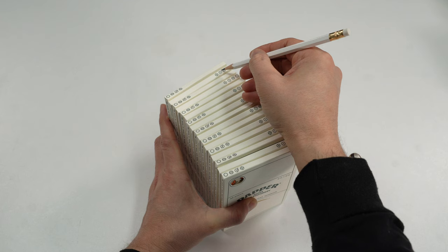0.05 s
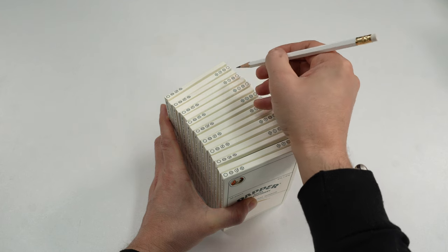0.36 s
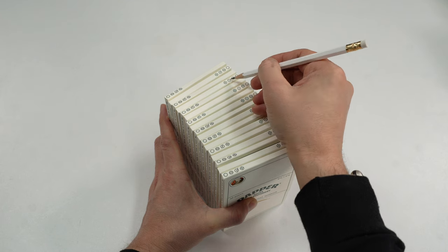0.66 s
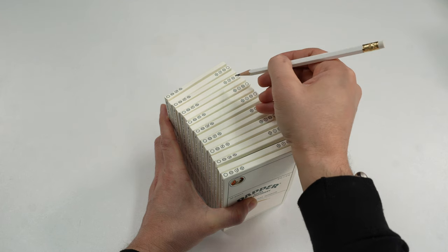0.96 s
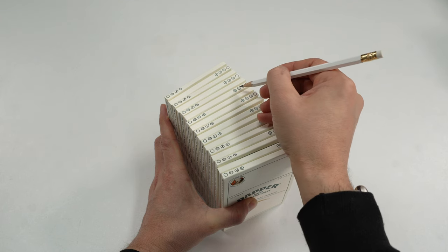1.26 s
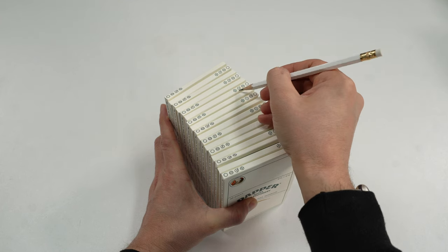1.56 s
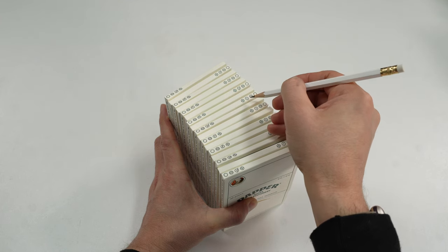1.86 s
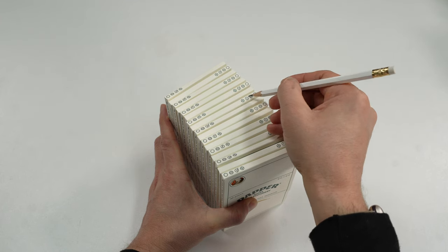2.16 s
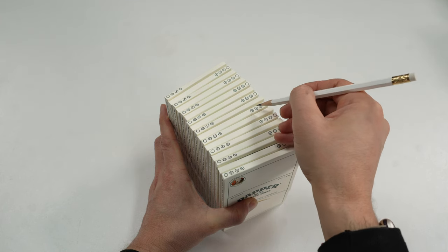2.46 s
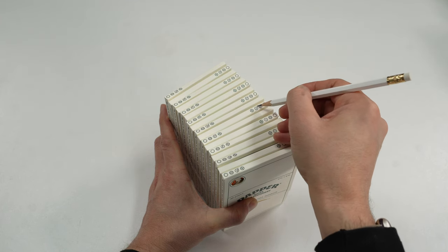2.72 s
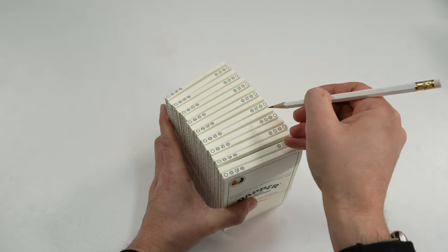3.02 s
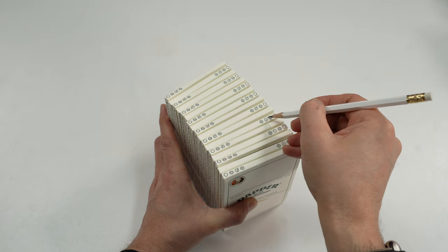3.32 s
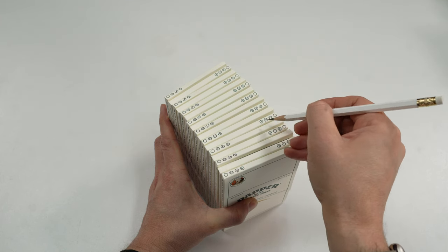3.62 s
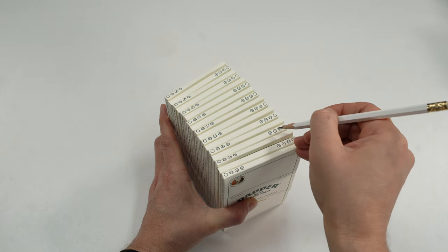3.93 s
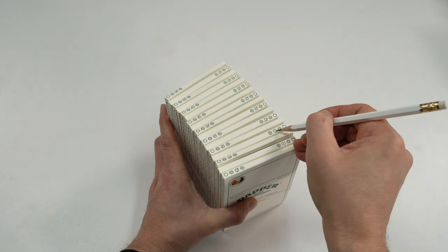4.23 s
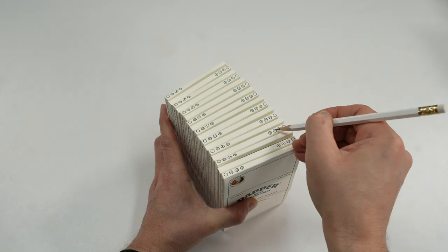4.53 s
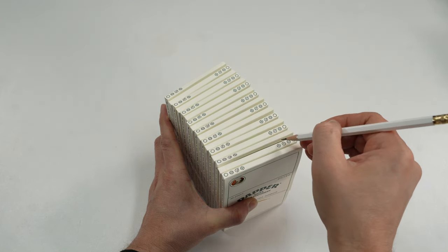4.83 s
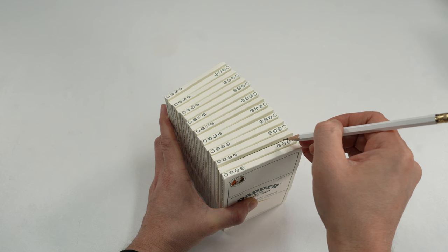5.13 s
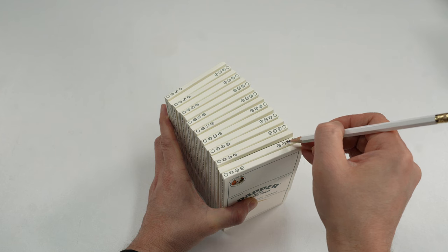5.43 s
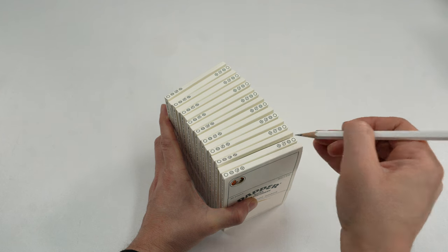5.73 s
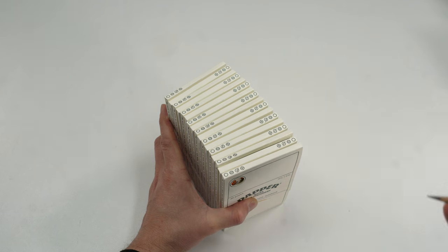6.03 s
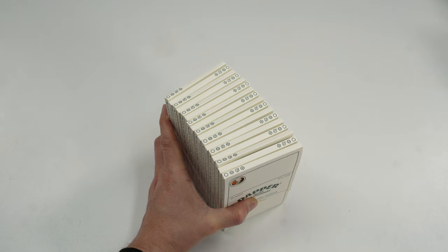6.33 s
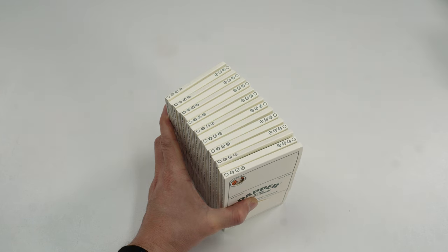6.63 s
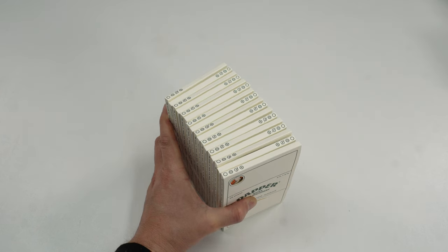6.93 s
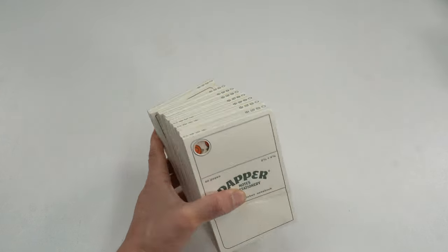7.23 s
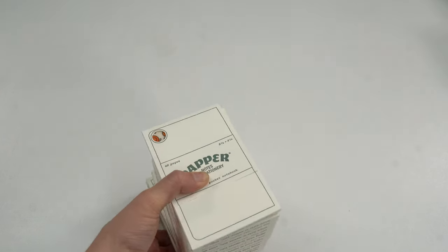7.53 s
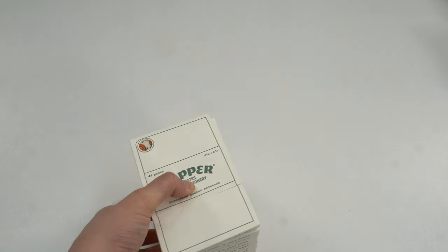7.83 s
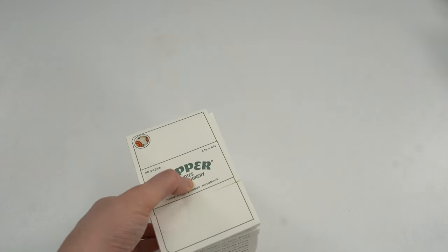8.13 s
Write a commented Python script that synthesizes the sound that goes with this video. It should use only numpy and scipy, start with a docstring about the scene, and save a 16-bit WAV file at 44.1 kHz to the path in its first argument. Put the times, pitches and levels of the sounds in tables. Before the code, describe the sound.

A pencil makes eight quick, evenly paced ticks on a stack of paper-wrapped notebooks, each a tiny scratch with a click, among light taps and finger rustles. A sleeve brushes faintly. Then the stack is tipped over, much louder: edges judder on the table, covers scrape together and the notebooks flop down with several thuds. The microphone is close, in a quiet room with a low hum.

```python
"""A table in a quiet, humming room, the microphone close to a stack of eight paper-wrapped notebooks.
A pencil ticks them off: each tick is two quick legs of graphite hissing over paper, with light taps
and finger brushes between ticks. Then a hand tips the stack over: its edges judder on the table,
the covers scrape across each other, the notebooks flop down and the table shakes."""
import sys
import numpy as np
from scipy import signal
from scipy.fft import rfft, irfft
from scipy.io import wavfile
from scipy.ndimage import uniform_filter1d

SR = 44100
rng = np.random.default_rng(int(sys.argv[2]) if len(sys.argv) > 2 else 0)


def store_pcm(level_fs):
    """Save levels as 16-bit WAV."""
    pcm = np.round(np.clip(level_fs, -1, 1) * 32767).astype(np.int16)
    wavfile.write(sys.argv[1], SR, np.atleast_2d(pcm).T)


N = 360289
TIME = np.arange(N) / SR

# One pencil tick a notebook, a leg down and a leg up: turn_s, down_s, rest_s (below 0 the legs overlap),
# up_s, down_hiss_db, up_hiss_db, body_db, down_crest (place of top speed, 0-1)
TICKS = [(0.2147, 0.023, 0.0016, 0.038, -28, -25.5, -28.5, 0.77),
         (0.917, 0.026, 0.0031, 0.038, -27.5, -24, -28.5, 0.67),
         (1.604, 0.021, 0.000032, 0.036, -30, -27, -31, .55),
         (2.299, .021, .003, 0.035, -27.5, -25.5, -29.5, .6),
         (2.936, 0.026, -0.0019, 0.022, -24, -27.5, -30.5, 0.13),
         (3.5865, .018, 0.0029, 0.043, -28.5, -27, -25, 0.77),
         (4.618, .034, -0.0024, 0.026, -28.5, -28.5, -28, 1),
         (5.6925, .041, -0.00014, 0.042, -33, -29.5, -32.5, 0.91)]


def amp(db):
    """Decibels to gain."""
    return 10 ** (np.asarray(db) / 20)


def unit(x):
    """Scales to rms 1."""
    return x / np.sqrt(np.mean(x ** 2) + 1e-20)


def steady(x, size=1300):
    """Holds the short-term rms at 1, leaving the fine grain."""
    return x / np.sqrt(abs(uniform_filter1d(x ** 2, size)) + 1e-12)


def read(points, hz):
    """Reads a table on a log-frequency axis."""
    f, value = np.transpose(points)
    return np.interp(np.log(hz + 1), np.log(f), value)


def add(mix, s, sound):
    """Mixes a sound in at time s."""
    part = mix[max(round(s * SR), 0):][:len(sound)]
    part += sound[:len(part)]


def impulse(spectrum, size=4096):
    """The causal click that has this spectrum."""
    log_gain = np.log(amp(read(spectrum, abs(np.fft.fftfreq(size, 1 / SR)))))
    return np.fft.ifft(np.exp(np.conj(signal.hilbert(log_gain)))).real[:size // 2]


def colour(x, spectrum):
    """Filters x by a spectrum, to rms 1."""
    return unit(signal.oaconvolve(x, impulse(spectrum))[:N])


def noise(spectrum):
    """Smooth noise of rms 1, shaped by rows of freq_hz, level_db."""
    gain = amp(read(spectrum, np.fft.rfftfreq(N, 1 / SR)))
    return unit(irfft(rfft(rng.standard_normal(N)) * gain, N))


def drift(size):
    """A random wander of rms 1, smoothed over size samples."""
    return unit(uniform_filter1d(uniform_filter1d(rng.standard_normal(N), size), size))


def grains(per_s, spread_db):
    """Fibres letting go: random clicks of uneven size."""
    sizes = amp(spread_db * np.minimum(rng.exponential(1, N), 4))
    return sizes * rng.choice([-1, 1], N) * (rng.random(N) < per_s / SR)


def ring(modes, detune, size=6000):
    """Dying modes with a peak of 1, detuned as each blow lands on a slightly different spot."""
    t = np.arange(size) / SR
    out = np.zeros(size)
    for hz, db, t60 in modes:
        pitch_hz = hz * (1 + detune * rng.uniform(-1, 1))
        out += amp(db - 60 * t / t60) * np.sin(2 * np.pi * pitch_hz * t)
    return out / abs(out).max()


def ringing(x, modes):
    """Rings a set of modes with the drive x, to rms 1."""
    return unit(signal.oaconvolve(x, ring(modes, detune=0))[:N])


def strokes(rows, hiss, body, fullness):
    """Each stroke peaks in speed at its crest (0-1) and stops; friction noise follows the speed."""
    out = np.zeros(N)
    for start, end, hiss_db, body_db, crest in rows:
        at = np.arange(round(start * SR), round(end * SR))
        fastest = at[0] + np.clip(crest, .05, .95) * len(at)
        progress = np.interp(at, [at[0], fastest, at[-1]], [0, .5, 1])
        speed = abs(np.sin(np.pi * progress)) ** fullness
        out[at] += speed * (amp(hiss_db) * hiss[at] + amp(body_db) * body[at])
    return out


def room_tone(air_db=-33.0, waver_db=1.0, waver_hz=5):
    """Ventilation noise and faint, wavering electrical tones behind the table."""
    # Ventilation spectrum: freq_hz, level_db
    air = [(12, -2.5), (20, 4.5), (32, -4.5), (50, -11.5), (76, -9), (98, -17.5), (135, -14.5), (220, -19),
           (370, -20.5), (520, -18), (800, -24.5), (1400, -34), (2600, -42), (3700, -41.5), (4600, -40),
           (5900, -45.5), (16000, -49.5)]
    # Electrical tones: pitch_hz, level_db
    whine = [(1163, -58.5), (14896, -63.5)]
    tones = np.zeros(N)
    for hz, db in whine:
        gain = amp(db + waver_db * drift(size=3000))
        phase = 2 * np.pi * np.cumsum(hz + waver_hz * drift(size=700)) / SR
        tones += gain * np.sqrt(2) * np.sin(phase)
    return amp(air_db) * noise(air) + tones


def knocks(rows, crumple_db=6.0, crumple_s=0.0011):
    """A sharp click with a brief crumple, a pop of the wrapper and a thud of the paper block."""
    # Contact click: freq_hz, level_db
    click_spectrum = [(200, 1), (1100, 2), (1900, 1.5), (2900, -3.5), (4000, -4.5), (6500, -15.5),
                      (9000, -15.5), (16000, -19)]
    # Modes of the wrapper and of the paper block: pitch_hz, level_db, t60_s
    pop_modes = [(880, -10, 0.043), (1096, 2.5, 0.015), (1327, 3, 0.016), (1680, -10, 0.017),
                 (2190, -8, 0.017)]
    thud_modes = [(106, -7.5, 0.19), (251, 2, 0.029), (337, -28, 0.016), (487, -15, 0.023)]
    click = impulse(click_spectrum)
    click /= abs(click).max()
    decay = np.exp(-TIME[:len(click)] / crumple_s)
    out = np.zeros(N)
    for s, click_db, pop_db, thud_db in rows:
        fibres = rng.standard_normal(len(click)) * (1 - decay) * decay
        crumple = signal.fftconvolve(click, fibres / np.linalg.norm(fibres))[:len(click)]
        add(out, s, amp(click_db) * (click + amp(crumple_db) * crumple))
        add(out, s, amp(pop_db) * ring(pop_modes, detune=0.048))
        add(out, s, amp(thud_db) * ring(thud_modes, detune=0.25))
    return out


def taps(pop_below_click_db=7):
    """The tip or a finger lands lightly on the stack."""
    # Landings: start_s, click_db, thud_db
    landings = [(0.1399, -26.5, -22.5), (0.289, -26, -37), (0.3429, -26, -20.5), (.8295, -31, -31),
                (1.515, -28, -28), (2.1946, -25, -17.5), (3.298, -47, -45), (3.802, -27, -21.5),
                (6.4746, -20, -39)]
    return knocks([(s, db, db - pop_below_click_db, thud_db) for s, db, thud_db in landings])


def pencil(snag_db=1.0, down_body_db=-4.5, up_crest=0.23):
    """Graphite hisses over the fibres; the tip catches unevenly and drums on the wrapper."""
    # Spectra of the graphite's hiss and the paper's drumming: freq_hz, level_db
    graphite = [(500, -8), (2400, -4), (4000, -15), (5200, -8), (6100, -18), (7300, -7), (8100, 1.5),
                (8900, -3), (9800, -6), (12500, -0.5), (15500, -4), (17000, -5)]
    paper = [(40, -12.5), (120, 5.5), (300, -2.5), (620, -8.5), (850, -12), (1120, 2), (1550, -14),
             (2300, -17), (2800, -19.5), (3200, -16.5), (6000, -23), (14000, -33)]
    catch_db = snag_db * drift(size=110)
    hiss = steady(colour(grains(per_s=18000, spread_db=1.0), graphite), size=400)
    hiss *= unit(amp(.5 * catch_db))
    body = steady(colour(grains(per_s=6000, spread_db=2.5), paper), size=500)
    body *= unit(amp(catch_db))
    legs = []
    for turn, down_s, rest_s, up_s, down_db, up_db, body_db, down_crest in TICKS:
        legs.append((turn - down_s, turn - rest_s / 2, down_db, body_db + down_body_db, down_crest))
        legs.append((turn + rest_s / 2, turn + up_s, up_db, body_db, up_crest))
    return strokes(legs, hiss, body, fullness=0.68)


def snags(snag_thud_db=-38, drop_thud_db=-24):
    """In mid tick the tip snags on a wrapper's edge, then drops off: a softer click, a harder thud."""
    # Catches on an edge: start_s, click_db, pop_db, drop_after_s
    catches = [(.225, -28, -14.5, 0.012), (0.9267, -20, -12, 0.011), (2.3087, -29, -16.5, 0.01),
               (2.9306, -20, -24, 0.024), (3.622, -19, -20, .006), (4.6136, -16, -18, .011),
               (5.704, -19.5, -17, 0.016)]
    rows = []
    for s, click_db, pop_db, drop_after_s in catches:
        rows.append((s, click_db, pop_db, snag_thud_db))
        rows.append((s + drop_after_s, click_db - 2.5, pop_db - 2, drop_thud_db))
    return knocks(rows)


def table(sway_db=-27, settle_s=0.071, full_leg_s=0.037):
    """The table sways after each tick, more for a long up leg, and rocks when the stack falls."""
    # Rumble of the table under the hands: freq_hz, level_db
    sway = [(6, -49), (13, 4), (20, 2.5), (38, -4.5), (70, -30), (110, -43), (300, -60)]
    # Rocking under the stack: start_s, level_db, pitch_hz, t60_s, rise_s
    shakes = [(7.435, 2, 17.7, 0.84, 0.054), (7.8958, 4.5, 96, 0.036, 0.0013), (7.939, 4, 17.4, 0.53, 0.04),
              (7.958, -3.5, 41.6, 0.42, 0.035)]
    push = np.zeros(N)
    for turn, _, _, up_s, *_ in TICKS:
        age = np.maximum(TIME - turn - up_s, 0) / settle_s
        push += (up_s / full_leg_s) ** 2 * age * np.exp(1 - age)
    out = amp(sway_db) * push * steady(noise(sway), size=6000)
    t = TIME[:SR]
    for s, db, hz, t60, rise in shakes:
        envelope = amp(db - 60 * t / t60) * (1 - np.exp(-t / rise))
        add(out, s, envelope * np.sin(2 * np.pi * hz * t))
    return out


def fingers(wrapper_db=3, brush_crest=0.15, flick_s=0.025, flick_crest=0.6):
    """Soft rubs of the fingers rustle and ring the wrappers."""
    # Fingers shifting: start_s, length_s, rustle_db, body_db
    brushes = [(0.343, 0.04, -35.5, -37.5), (0.368, 0.12, -45, -52), (0.464, 0.073, -43, -41),
               (1.021, 0.062, -37, -47), (1.805, 0.11, -47, -49), (2.203, 0.039, -48, -40.5),
               (3.793, 0.057, -47, -49), (4.272, .055, -51, -46), (4.43, 0.11, -55, -49),
               (6.472, 0.069, -40.5, -36.5), (6.917, 0.14, -57, -40)]
    # A short flick after every tick: start_s, rustle_db, body_db
    flicks = [(.282, -42.5, -30), (0.992, -48, -33.5), (1.666, -41, -32), (2.355, -42, -48),
              (2.985, -41.5, -40.5), (3.662, -48, -44), (4.668, -40.5, -41.5), (5.74, -40.5, -47)]
    # Spectra of a brushed wrapper's rustle and hollow body: freq_hz, level_db
    rustle_spectrum = [(400, 1), (2200, -37), (2900, 8), (4500, 7.5), (6500, 5), (8200, 6), (10500, -6),
                       (14000, 6), (17000, -45)]
    hollow = [(40, 0), (130, 8.5), (300, 3), (480, -1), (680, -12), (950, 5.5), (1180, -5.5), (1380, 1.5),
              (1700, 0.5), (2150, -10.5), (2700, -17), (6000, -37), (14000, -20)]
    # Crisp wrapper modes: pitch_hz, level_db, t60_s
    wrapper_modes = [(2830, -0.5, 0.013), (3540, 1, 0.009), (4050, 7, 0.0036), (4440, 6, 0.011),
                     (5300, 10.5, 0.0045), (7430, 2, 0.013), (8700, 10.5, 0.0046)]
    rustle = colour(grains(per_s=11000, spread_db=3.0), rustle_spectrum)
    crinkle = ringing(grains(per_s=3000, spread_db=4.5), wrapper_modes)
    body = steady(colour(grains(per_s=5000, spread_db=1.5), hollow), size=700)
    rubs = [(s, s + length_s, *levels, brush_crest) for s, length_s, *levels in brushes]
    rubs += [(s, s + flick_s, *levels, flick_crest) for s, *levels in flicks]
    return strokes(rubs, steady(rustle + amp(wrapper_db) * crinkle), body, fullness=0.72)


def sleeve():
    """Cloth hushes as a sleeve draws back, just before the stack goes over."""
    # Swell of the cloth: time_s, level_db
    swell = [(5.7, -66), (6.1, -49.5), (6.4, -45.5), (6.6, -46.5), (6.8, -49.5), (7.05, -39)]
    cloth = noise([(300, 9), (1500, -2.0), (5000, -5.5), (9000, -11.5), (16000, -25)])
    return amp(np.interp(TIME, *np.transpose(swell), left=-120, right=-120)) * cloth


def judder(slips_per_s=160, jitter=.25, uneven_db=5.5, burst_s=0.0081):
    """The bottom edges stick and slip, ringing stack and table top; returns groan and slip bursts."""
    # Modes rung by each slip: pitch_hz, level_db, t60_s
    modes = [(202, -8.5, 0.078), (266, -1.5, 0.086), (309, -3, 0.063), (371.6, -1, 0.074), (425, -14, 0.06),
             (560, -25, 0.022)]
    # Response of the table top: freq_hz, level_db
    table_top = [(60, -3.5), (140, -8), (205, -8), (300, 1.5), (380, 0.5), (550, -3.5), (800, -7.5),
                 (3000, 0)]
    slip_count = np.cumsum(slips_per_s * np.exp(jitter * drift(size=200))) / SR
    slips = np.diff(np.floor(slip_count), prepend=0) * amp(uneven_db * rng.standard_normal(N))
    groan = steady(colour(ringing(slips, modes), table_top), size=1200)
    bursts = unit(signal.lfilter([1], [1, -np.exp(-1 / (burst_s * SR))], slips))
    return groan, bursts


def cover_scrape(grip, cover_db=-3, hollow_db=-3, hollow_width_hz=340):
    """Covers scrape across each other, through a resonance that follows the lean of the stack."""
    # Rubbed board: freq_hz, level_db
    board = [(120, -36), (230, -29), (350, -4), (550, 2.5), (900, 3), (1300, -1.5), (1650, 6), (2100, -2),
             (3000, -9.5), (6000, -44)]
    # Cover modes: pitch_hz, level_db, t60_s
    cover_modes = [(525, 6.5, 0.034), (689, 1.5, 0.038), (806, -23, 0.13), (955, -1.5, 0.031),
                   (1144, 5.5, 0.017), (1324, -0.5, 0.041), (1455, 1.5, 0.021), (1660, -9, 0.019),
                   (2070, -10, 0.045)]
    # The covers ring higher as the stack leans, and again as it settles: time_s, pitch_hz
    lean = [(7.05, 418), (7.24, 487), (7.35, 910), (7.378, 1690), (7.405, 1630), (7.425, 800), (7.52, 835),
            (7.58, 1500), (8.1, 1216)]
    rub = colour(grip * grains(per_s=7600, spread_db=0.5), board)
    rub = rub + amp(cover_db) * ringing(rub, cover_modes)
    # shift the moving pitch to zero, smooth, shift back
    carrier = np.exp(2j * np.pi * np.cumsum(np.interp(TIME, *np.transpose(lean))) / SR)
    pole = np.exp(-np.pi * hollow_width_hz / SR)
    hollow = steady((carrier * signal.lfilter([1 - pole], [1, -pole], rub / carrier)).real)
    return steady(rub + amp(hollow_db) * hollow)


def slide_gains(rise_power=1.54, judder_power=1.33, hiss_power=1.1):
    """Gains of judder, scrape, hiss and glide: each slide gathers speed, holds it and dies away."""
    # Shove, topple, two slips, last skid, settling:
    # start_s, rise_s, hold_s, speed_fall_db_per_s, judder_db, scrape_db, hiss_db, glide_db
    slides = [(7.022, 0.083, 0.14, 250, -10, -17.5, -28.5, -51),
              (7.192, .11, 0.084, 108, -28.5, -12, -22.5, -34),
              (7.451, 0.03, .035, 39, -25, -23, -31.5, -38),
              (7.664, 0.031, 0.037, 98.5, -25, -33, -38, -36.5),
              (7.785, 0.1, 0.012, 1200, -26.5, -23.5, -27.5, -30.5),
              (7.893, 0.029, 0.014, 207, -22.5, -20, -32, -43)]
    power = np.zeros((4, N))
    for start, rise, hold, fall, *levels_db in slides:
        age = TIME - start
        speed = np.clip(age / rise, 0, 1) ** rise_power * amp(-fall * np.maximum(age - rise - hold, 0))
        airy = speed ** hiss_power
        power += np.square(amp(levels_db)[:, None] * [speed ** judder_power, speed, airy, airy])
    return np.sqrt(power)


def tipping_stack(chop=0.37):
    """The stack slides over; the slips of its edges chop the scrape of covers and the hiss of paper."""
    # Sliding paper: freq_hz, level_db
    paper = [(900, -32), (1800, -8), (2500, 0), (3300, 1), (5000, 0), (6500, -6.5), (8500, -6.5),
             (10500, -17), (13000, -16.5), (16000, -25)]
    groan, bursts = judder()
    grip = 1 + chop * (bursts - 1)
    scrape = cover_scrape(grip)
    hiss = steady(colour(grip * grains(per_s=10000, spread_db=-1.5), paper))
    # wrappers gliding loosely over each other give a finer, brighter hiss
    glide = noise([(3000, -28), (7000, -6), (8300, 1), (10500, -8), (13000, -9), (16000, -20)])
    return (slide_gains() * [groan, scrape, hiss, glide]).sum(axis=0)


def flops():
    """Notebooks snap past each other and land on the table."""
    # Snaps and landings: start_s, click_db, pop_db, thud_db
    landings = [(7.370, -11, -15, -33), (7.5468, -8, -10, -15), (7.674, -24, -10, -41),
                (7.683, -8, -7, -16), (7.863, -6, -18, -19.5), (7.901, -7, -2, -12),
                (7.928, -23, -17, -8.5), (7.944, -19, -20, -13)]
    return knocks(landings, crumple_db=4.5, crumple_s=0.0015)


def room(x, size=22050, echoes_per_s=3000, gap_s=.004):
    """A small room: sparse reflections, the top treble dying first."""
    # Decay of the room: freq_hz, t60_s
    decay = [(150, 0.67), (600, 0.19), (2000, 0.23), (5000, 0.36), (8500, 0.2), (15000, 0.074)]
    echoes = rng.choice([-1, 1], size) * (rng.random(size) < echoes_per_s / SR) * (TIME[:size] > gap_s)
    hz, t, bands = signal.stft(echoes, SR, nperseg=256)
    bands = bands * amp(-60 * t / read(decay, hz)[:, None])
    _, tail = signal.istft(bands, SR, nperseg=256)
    return signal.oaconvolve(x, tail / np.linalg.norm(tail))[:N]


def scene():
    """The table top heard from close by, in mono, with the room well behind it."""
    writing = pencil() + fingers() + sleeve() + taps() + snags()
    tipping = tipping_stack() + flops()
    reflections = room(amp(-10.0) * writing + amp(-15.5) * tipping)
    return (writing + tipping + reflections + table() + room_tone())[None]


def record(dry, edge_hz=15900):
    """The microphone signal clips at full scale, then loses its highest treble."""
    low_pass = signal.firwin(511, edge_hz, window=("kaiser", 9), fs=SR)
    return signal.oaconvolve(np.clip(dry, -1, 1), low_pass[None], "same")


dry = scene()
out = record(dry)
store_pcm(out)
```